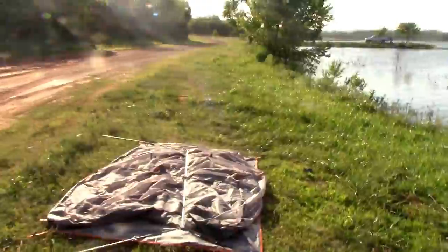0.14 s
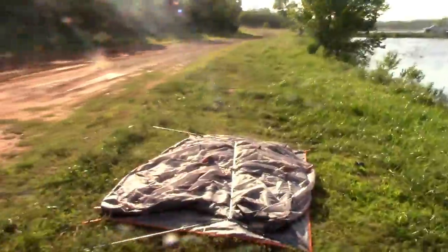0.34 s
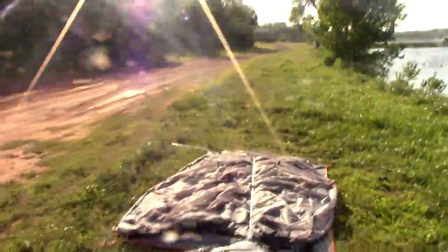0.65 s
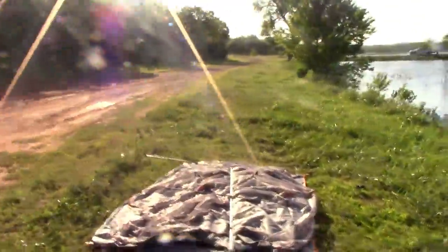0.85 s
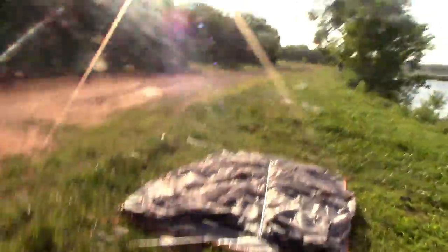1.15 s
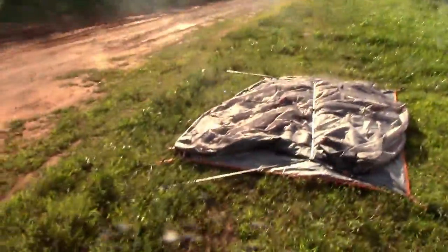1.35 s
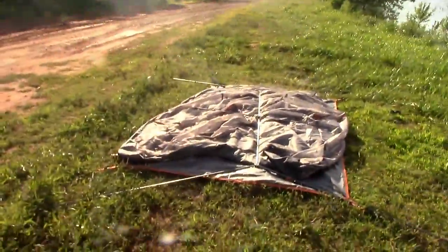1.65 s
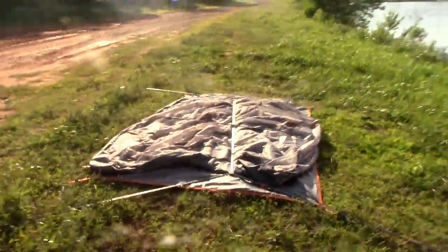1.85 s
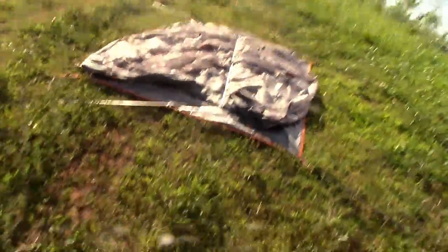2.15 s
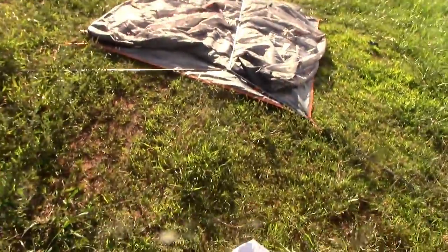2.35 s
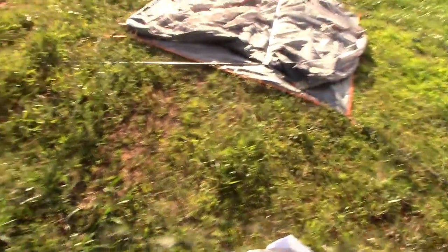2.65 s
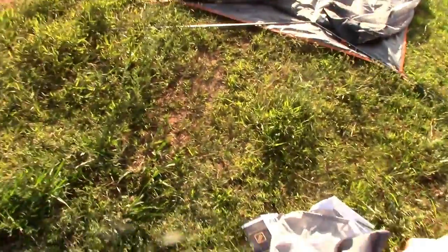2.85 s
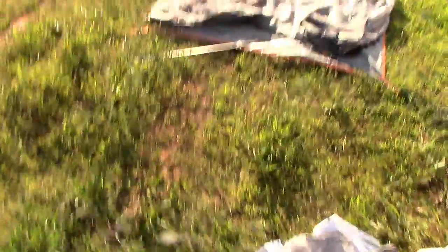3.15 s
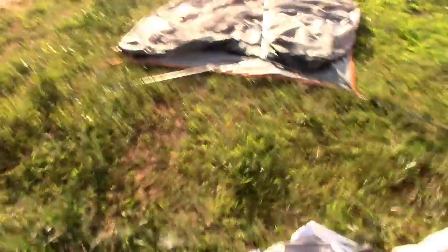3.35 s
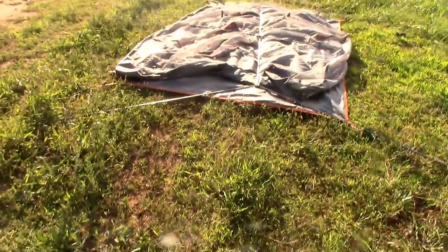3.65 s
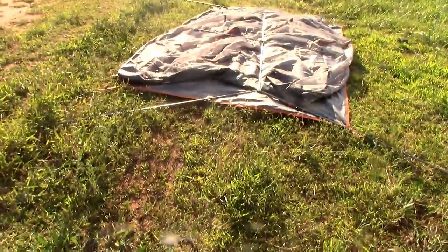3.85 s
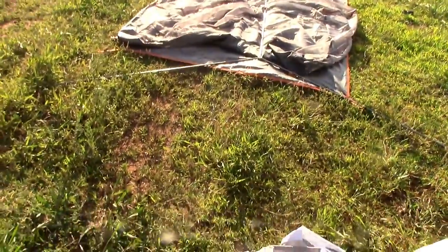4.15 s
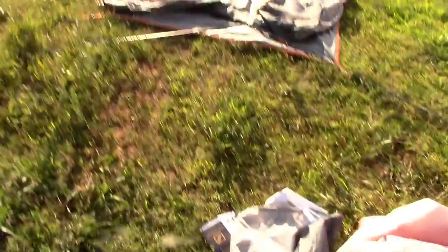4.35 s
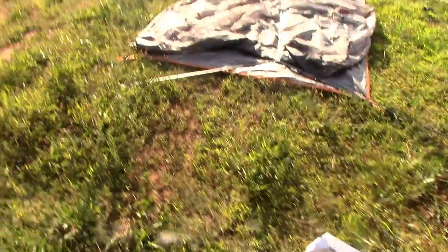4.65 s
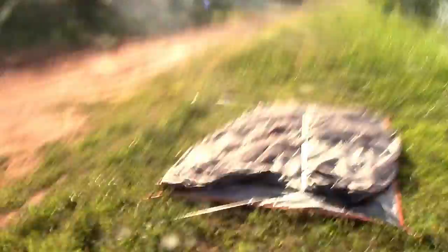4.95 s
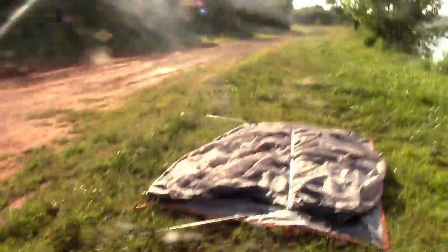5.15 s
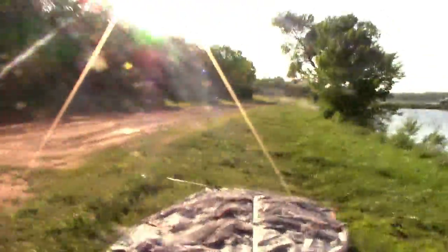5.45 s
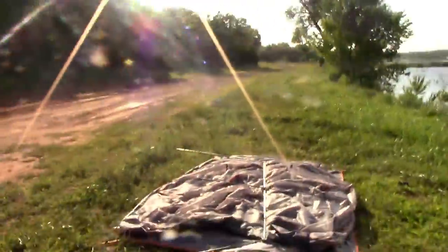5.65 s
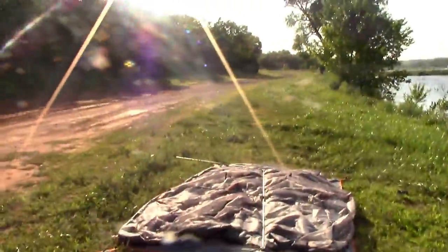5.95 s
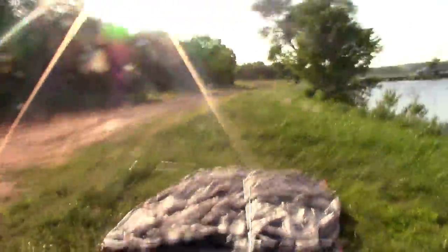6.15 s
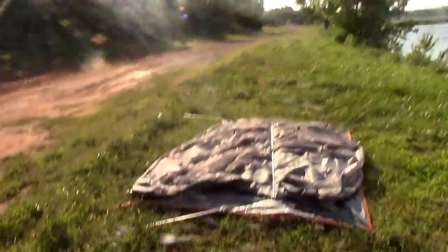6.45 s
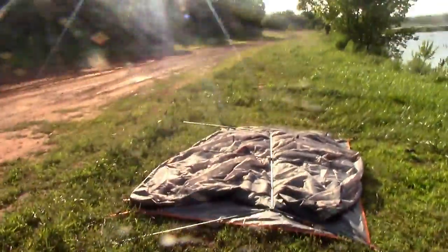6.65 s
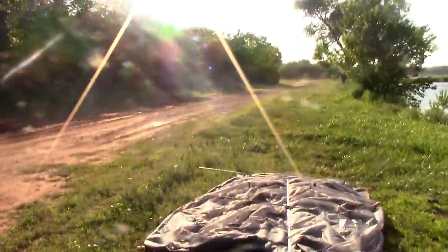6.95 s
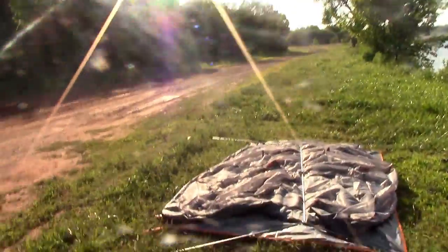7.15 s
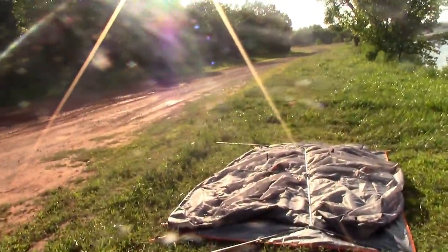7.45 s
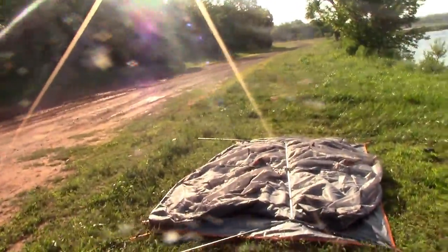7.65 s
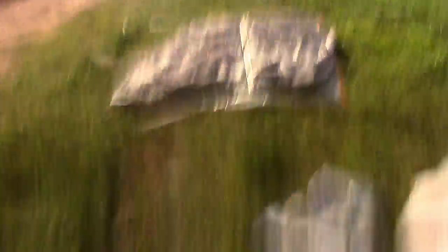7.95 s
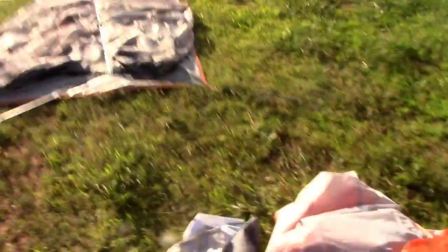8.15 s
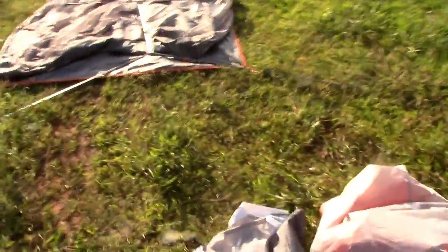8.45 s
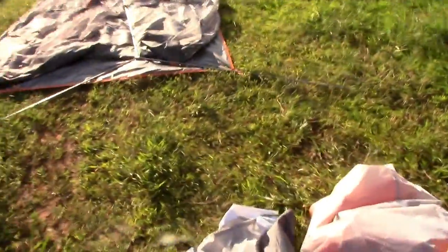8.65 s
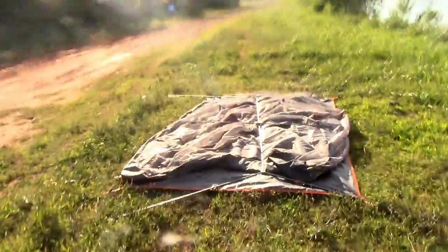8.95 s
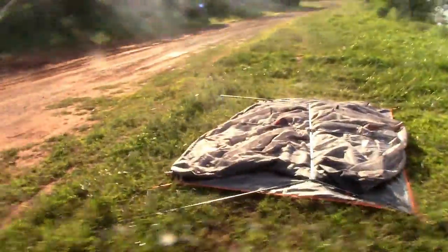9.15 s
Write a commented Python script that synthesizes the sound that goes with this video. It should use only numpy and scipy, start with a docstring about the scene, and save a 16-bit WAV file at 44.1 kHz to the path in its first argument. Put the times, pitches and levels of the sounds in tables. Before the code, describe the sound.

Irregular hard clacks of thin metal poles and crisp nylon rustling, loudest around the middle and near the end, with insects whining faintly outdoors.

```python
"""A tent is being pitched on a grassy lake bank: nylon stirs, poles and fittings clack close by.
First a thin insect whine over faint open air, one nearer singer fading by 4.4 s; the chorus sinks to 7.3 s.
From 0.3 s pole contacts ring damped modes; clusters thicken, hardest near 5 s and 8 s, the last at 9.2 s.
Pulls on the cloth shape noise and crease snaps into rubbing, crinkling and swish; noise glides, mostly
narrow, whistle, squeak or rasp; the one at 8.37 s is a broad swish of cloth."""
import sys
import numpy as np
from scipy import signal
from scipy.fft import rfft, irfft
from scipy.io import wavfile

SR = 44100
rng = np.random.default_rng(int(sys.argv[2]) if len(sys.argv) > 2 else 0)


def wav_record(signal):
    """Record a signal, one row per channel, as 16-bit PCM in the file named by sys.argv[1]."""
    frames = np.transpose(np.atleast_2d(signal))
    bounded = np.clip(frames, -1, 1)
    # unit amplitude maps onto the largest positive 16-bit level
    quanta = np.round(bounded * 32767).astype(np.int16)
    wavfile.write(sys.argv[1], SR, quanta)


N = 410571
CUTOFF_HZ = 16000  # top of the recorder and cap on mode pitch


def from_db(db):
    """Decibels to gain."""
    return 10 ** (np.asarray(db) / 20)


def rms_one(x):
    """Scale to an rms of 1."""
    return x / np.sqrt(np.mean(x ** 2) + 1e-20)


def in_time(rows):
    """Interpolate each column of a time curve, sample by sample."""
    s, *columns = np.transpose(rows)
    return [np.interp(np.arange(N) / SR, s, c) for c in columns]


def drift(rate_hz, step=40):
    """Smooth random curve, spread about 1: two-pole low-passed noise, computed every 40 samples."""
    r = np.exp(-2 * np.pi * rate_hz * step / SR)
    noise = rng.standard_normal(N // step + 2002)
    slow = signal.lfilter([1], [1, -2 * r, r * r], noise)[2000:]  # drop the settling
    return np.interp(np.arange(N) / step, np.arange(len(slow)), rms_one(slow))


def coloured(x, spectrum, size=4096):
    """Causal minimum-phase filter with the given spectrum; rms 1."""
    hz, db = np.transpose(spectrum)
    log_hz = np.log(np.maximum(np.arange(size // 2 + 1), .5) * SR / size)
    beyond = np.abs(log_hz - np.clip(log_hz, np.log(hz[0]), np.log(hz[-1])))
    log_gain = np.log(from_db(np.interp(log_hz, np.log(hz), db)))
    cepstrum = irfft(log_gain - 2 * beyond)  # 12 dB/octave outside the table
    response = irfft(np.exp(rfft(2 * cepstrum[:size // 2], size)))
    return rms_one(signal.oaconvolve(x, response)[:N])


def band(x, low_hz, high_hz):
    """Butterworth band-pass."""
    return signal.sosfilt(signal.butter(2, [low_hz, high_hz], "band", fs=SR, output="sos"), x)


def pitched_noise(hz, width_hz):
    """A band of noise around a moving pitch, an unsteady tone when narrow; rms 1."""
    smooth = signal.butter(2, width_hz / 2, fs=SR, output="sos")
    a, b = signal.sosfilt(smooth, rng.standard_normal((2, len(hz))))
    phase = 2 * np.pi * np.cumsum(hz) / SR
    return rms_one(a * np.cos(phase) + b * np.sin(phase))


# open-air spectrum: f/Hz, relative density/dB per Hz
OPEN_AIR = [(25, -20), (60, -13), (130, -7), (250, 5), (360, 5), (650, 5.5), (1200, -1.5), (2000, -4),
            (3000, -15.5), (6000, -40), (15000, -42)]


def open_air(level_db=-56):
    """Distant, even outdoor noise: steady coloured noise."""
    return from_db(level_db) * coloured(rng.standard_normal(N), OPEN_AIR)


def strands(lowest_hz=3950, highest_hz=4550, width_hz=22, count=5):
    """Single singers stand out as fine wavering lines, the higher ones stronger; rms 1."""
    voices = zip(np.linspace(lowest_hz, highest_hz, count), np.linspace(.5, 1, count))
    return rms_one(sum(gain * pitched_noise(hz + width_hz * drift(2), width_hz) for hz, gain in voices))


# chorus spectrum: f/Hz, relative density/dB per Hz
CHORUS_SPECTRUM = [(2900, -33), (3600, -6), (4100, -7.5), (4480, -3), (4800, -10.5), (5150, -14.5),
                   (6500, -33), (8900, -17), (10000, -29), (12000, -30.5), (14000, -34.5)]
# chorus course: t/s, level/dB
CHORUS_LEVEL = [(0, -47), (2.6, -48), (4.4, -50.5), (5.9, -52.5), (7.3, -56), (9.3, -56)]
# nearer insect: t/s, f/Hz, level before partials/dB
SINGER = [(0, 3884, -53.5), (1.4, 3872, -49.5), (2.7, 3973, -50.5), (3.9, 3730, -52.5), (4.4, 3710, -58)]
# its partials: multiple of pitch, width/Hz, relative level/dB
SINGER_PARTIALS = [(1, 1160, -3.5), (2, 1400, -5.5), (3, 1400, -5.5)]


def insects(shimmer_db=2.5, strands_db=-4.0):
    """Many small singers blur into one narrow band; a nearer one wavers in pitch and fades back."""
    chorus_db, = in_time(CHORUS_LEVEL)
    blur = coloured(rng.standard_normal(N), CHORUS_SPECTRUM)
    chorus = from_db(chorus_db + shimmer_db * drift(17)) * blur
    lines = from_db(chorus_db + strands_db) * strands()
    pitch_hz, singer_db = in_time(SINGER)
    singer = sum(from_db(db) * pitched_noise(multiple * pitch_hz, width_hz)
                 for multiple, width_hz, db in SINGER_PARTIALS)
    return chorus + lines + from_db(singer_db) * singer


# glides: start t/s, length/s, first f/Hz, last f/Hz, width/Hz, level before swell/dB
GLIDES = [(.33, .36, 1930, 2010, 100, -56), (1.905, .04, 4050, 4000, 250, -39),
          (1.97, .035, 1800, 1780, 90, -41), (4.08, .26, 2600, 2830, 380, -46),
          (4.6, .26, 2750, 2950, 420, -47), (5.855, .035, 6050, 5900, 700, -40),
          (.78, .5, 3740, 3830, 35, -47.5), (7.892, .022, 7150, 7080, 700, -29),
          (8.37, .062, 5800, 6200, 5000, -35)]


def glides():
    """Noise glides swell and fade: long ones likely far birds, short ones squeaking, rasping or swishing cloth."""
    out = np.zeros(N)
    for s, length_s, first_hz, last_hz, width_hz, db in GLIDES:
        start, n = round(s * SR), round(length_s * SR)
        swell = np.sqrt(np.hanning(n))
        glide = pitched_noise(np.linspace(first_hz, last_hz, n), width_hz)
        out[start:start + n] += from_db(db) * swell * glide
    return out


PULL_ATTACK_S, PULL_RELEASE_S = 0.032, 0.027


def pull_shape(start_s, length_s):
    """A pull takes up the cloth, holds and lets go; 0 to 1."""
    t = np.arange(N) / SR - start_s
    return np.clip(np.minimum(t / PULL_ATTACK_S, (length_s - t) / PULL_RELEASE_S), 0, 1)


# pulls on the nylon: start t/s, length/s, rub, crinkle, swish level before the nylon trims/dB
PULLS = [(0.078, .14, -54.5, -51.5, -55), (0.668, 0.237, -53, -47.5, -55), (1.167, 0.067, -47, -39.5, -50),
         (1.452, 0.069, -63, -41.5, -55), (1.679, .07, -40, -63, -44.5), (1.755, 0.19, -52, -46, -47),
         (1.964, 0.109, -44.5, -42.5, -54), (2.178, 0.19, -48, -43.5, -49), (2.682, 0.14, -45.5, -44, -49),
         (2.837, 0.26, -52.5, -49.5, -58), (3.152, .13, -35, -39.5, -41.5), (3.38, 0.298, -44.5, -44, -47),
         (3.872, 0.2, -47, -48.5, -52), (4.208, 0.18, -45.5, -41, -49), (4.454, 0.058, -43, -40.5, -39),
         (4.604, 0.21, -49.5, -52, -52.5), (4.918, .15, -31, -33, -43.5), (5.159, 0.21, -49.5, -51, -57),
         (5.434, 0.16, -46.5, -42.5, -52), (5.728, 0.14, -58, -49, -51),
         (5.844, 0.086, -38.5, -39.5, -47.5), (6.061, .12, -48, -38.5, -47), (6.258, 0.16, -48, -46, -50.5),
         (6.782, 0.16, -41, -45.5, -54), (6.9, 0.073, -45.5, -35.5, -39), (7.066, .15, -56, -52, -54.5),
         (7.427, 0.11, -61, -58, -52), (7.729, 0.15, -36, -35, -40.5), (7.831, .16, -32.5, -32, -38.5),
         (7.976, 0.1014, -31, -27, -38.5), (8.081, 0.1188, -41.5, -46, -63),
         (8.367, 0.079, -52, -41.5, -44), (8.49, .13, -39.5, -43, -45.5), (8.665, 0.14, -52, -44.5, -50.5),
         (8.807, 0.26, -43.5, -48.5, -52), (9.047, 0.26, -52, -47.5, -57)]
# shake of the cloth (rub, crinkle, swish) re the contact's (knock, clack, tick), before trims
SHAKE_DB, SHAKE_ATTACK_S, SHAKE_RELEASE_S = (-18, -22, -27), .01, 0.025
# slack cloth (rub, crinkle, swish), before trims
SLACK_DB, SLACK_WAVER_DB = (-53.5, -55, -62), 2.0


def cloth_levels():
    """Rub, crinkle and swish in dB: powers of slack stirring, pulls and contact shakes add up."""
    power = np.outer(from_db(SLACK_DB), from_db(SLACK_WAVER_DB * drift(9.1))) ** 2
    for start_s, length_s, *db in PULLS:
        shape = pull_shape(start_s, length_s)
        moving = np.flatnonzero(shape)
        power[:, moving] += np.outer(from_db(db), shape[moving]) ** 2
    near = np.arange(-SR // 10, SR // 10)  # samples around a contact
    shake = np.exp(np.minimum(near / SHAKE_ATTACK_S, -near / SHAKE_RELEASE_S) / SR)
    for s, _, knock_db, clack_db, _, tick_db, _ in CONTACTS:
        gains = from_db(np.add([knock_db, clack_db, tick_db], SHAKE_DB))
        power[:, np.clip(round(s * SR) + near, 0, N - 1)] += np.outer(gains, shake) ** 2
    return 10 * np.log10(power)


def friction(creases, grain_share, flutter_db):
    """Fluttering smooth sliding noise mixed with crease snaps of random strength."""
    share = np.clip(grain_share, 0, 1)
    snaps = rms_one(creases * rng.standard_normal(N))
    sliding = rng.standard_normal(N) * from_db(flutter_db * drift(46))
    return np.sqrt(share) * snaps + np.sqrt(1 - share) * sliding


def folds(x, low_hz, high_hz, shift_db, count):
    """Folds of different size take turns to sound, so band levels keep shifting; rms 1."""
    out, rest = 0, x
    for hz in np.geomspace(low_hz, high_hz, count):
        part = signal.sosfilt(signal.butter(3, hz, fs=SR, output="sos"), rest)
        rest = signal.sosfilt(signal.butter(3, hz, "high", fs=SR, output="sos"), rest)
        out = out + part * from_db(shift_db * drift(36.2))
    return rms_one(out + rest)


# cloth spectra: f/Hz, relative density/dB per Hz
RUB_SPECTRUM = [(30, -37.5), (130, -23.5), (220, -11), (340, 4.5), (520, 6), (1000, 0.5), (1400, -16),
                (1900, -15.5), (3000, -40)]
CRINKLE_SPECTRUM = [(900, -10), (1400, -6.5), (1750, -3), (2200, 4.5), (2750, 1.5), (3400, -12.5),
                    (4500, -30), (7000, -59)]
SWISH_SPECTRUM = [(2500, -12), (4000, 4.5), (5800, 3), (7200, -4), (8600, -3), (10500, -10.5), (13000, -10),
                  (16000, -23)]


def nylon(creases_per_s=240, size_db=6.0, clump_db=4.0, rub_trim_db=-0.5, crinkle_trim_db=2.5, swish_trim_db=2.0):
    """Cloth drags over poles and hands; creases give way in clumps."""
    rub_db, crinkle_db, swish_db = cloth_levels()
    # 0 to 1: light touches mostly slide, hard pulls snap creases
    effort = 1 / (1 + np.exp(-(np.maximum(rub_db, crinkle_db) + 51.5) / 3.7))
    # creases_per_s is the rate before clumping
    born = rng.random(N) < creases_per_s * from_db(clump_db * drift(20)) / SR
    creases = born * from_db(size_db * np.minimum(rng.exponential(1, N), 3))

    rub = friction(creases, grain_share=0.58 * effort, flutter_db=0.89 * effort)
    rub = folds(coloured(rub, RUB_SPECTRUM), 282, 1247, shift_db=3.25 * effort, count=4)
    crinkle = friction(creases, grain_share=0.57 * effort, flutter_db=2.0 * effort)
    crinkle = folds(coloured(crinkle, CRINKLE_SPECTRUM), 2250, 2690, shift_db=3.5, count=3)
    swish = coloured(friction(creases, grain_share=0.34, flutter_db=2.4), SWISH_SPECTRUM)
    return (from_db(rub_db + rub_trim_db) * rub
            + from_db(crinkle_db + crinkle_trim_db) * crinkle
            + from_db(swish_db + swish_trim_db) * swish)


def ring(force, modes, pitch=1, detune=0.058, spread_db=3.5):
    """A force rings damped modes; grip and striking point shift each one a little."""
    out = 0
    for k, (hz, width_hz, db) in enumerate(modes):
        r = np.exp(-np.pi * width_hz / SR)
        w = 2 * np.pi * min(hz * pitch * (1 + detune * rng.normal()), CUTOFF_HZ) / SR
        mode = signal.lfilter([1, 0, -1], [1, -2 * r * np.cos(w), r * r], force)
        out = out + (-1) ** k * from_db(db + spread_db * rng.normal()) * rms_one(mode)
    return out


def contact_force(chatter_s, chatter=0.93, scatter_db=-17, scatter_s=0.0036):
    """A first touch, a dying chatter of tiny slips, and faint scatter from the ground and cloth."""
    t = np.arange(SR // 20) / SR
    slips = rng.standard_normal(len(t)) ** 3 * np.exp(-t / max(chatter_s, 1 / SR))
    scatter = rng.standard_normal(len(t)) * np.exp(-t / scatter_s)
    touch = (t == 0) / (1 + (chatter_s / 0.0069) ** 2)  # long scrapes begin softly
    chatter_force = chatter * slips / np.linalg.norm(slips)
    scatter_force = from_db(scatter_db) * scatter / np.linalg.norm(scatter)
    return touch + chatter_force + scatter_force


# centre of the random light touches: thud, knock, clack level/dB, clack f/Hz, tick level/dB, chatter/s
LIGHT_TOUCH = (-53, -46, -37.5, 2388, -45, 0.12)
LIGHT_TOUCHES_PER_S, LIGHT_SPREAD_DB = 7, 3  # mean rate during pulls


def light_touches(count=120, pitch_spread=0.095):
    """Loose parts touch at random while the cloth drags them; rows like CONTACTS."""
    thud_db, knock_db, clack_db, clack_hz, tick_db, chatter_s = LIGHT_TOUCH
    keep_chance = LIGHT_TOUCHES_PER_S * N / SR / count
    rows = []
    for (when, chance), (body, edge, pitch) in zip(rng.random((count, 2)), rng.standard_normal((count, 3))):
        s, body_db, edge_db = when * N / SR, LIGHT_SPREAD_DB * body, LIGHT_SPREAD_DB * edge
        pulled = any(start_s < s < start_s + length_s for start_s, length_s, *_ in PULLS)
        if pulled and chance < keep_chance:
            rows.append((s, thud_db + body_db, knock_db + body_db, clack_db + edge_db,
                         clack_hz * np.exp(pitch_spread * pitch), tick_db + edge_db, chatter_s))
    return rows


# clear pole contacts: t/s, thud, knock, clack level/dB, clack f/Hz, tick level/dB, chatter/s
CONTACTS = [(0.272, -49, -36.5, -24, 1960, -29.5, 0.0009), (0.6967, -43, -38, -33, 2440, -37, 0.003),
            (0.7534, -26, -22, -14.5, 2810, -25.5, .0016), (0.7868, -49, -43, -29, 2400, -40, .0013),
            (.8042, -44, -35, -28.5, 2600, -35, .0046), (0.959, -64, -61, -28, 2310, -37, 0.0012),
            (0.9774, -64, -58, -27, 2520, -45, .002), (1.1005, -52, -51, -35.5, 2540, -45, 0.0018),
            (1.2226, -40, -32, -25.5, 2050, -38, 0.0023), (1.378, -57, -45, -27, 2375, -26, 0.0042),
            (1.636, -48, -34, -31, 2800, -35, 0.0027), (1.6803, -28, -20, -17.5, 2360, -25, 0.0045),
            (1.7696, -37, -35, -24, 3390, -23, 0.0032), (1.8984, -37, -30.5, -28.5, 2640, -29, 0.0049),
            (1.9243, -40, -33.5, -28, 2544, -28.5, 0.0046), (2.0368, -39, -38, -25, 2220, -50, .0014),
            (2.1231, -52, -35, -14.5, 2730, -19.5, 0.0013), (2.1439, -28, -16, -18, 2680, -22.5, 0.0051),
            (2.2157, -27.5, -27, -27.5, 2470, -37, 0.00054), (2.242, -34, -32, -24.5, 1690, -32, 0.0013),
            (2.274, -42, -23.5, -30, 2560, -35, 0.0074), (2.3146, -43, -41, -21.5, 2500, -27.5, 0.001),
            (2.4865, -38, -12.5, -19, 2670, -31.5, 0.0022), (2.494, -36, -20.5, -15, 2820, -25, 0.0052),
            (2.7261, -26, -42, -28, 2420, -32, 0.0069), (2.978, -41, -40, -27, 2010, -29.5, .001),
            (3.04, -57, -42, -29.5, 2210, -47, 0.0026), (3.1388, -42, -40, -28, 2220, -36, .0036),
            (3.1538, -42, -37, -27.5, 2570, -35.5, 0.0022), (3.2083, -23, -22.5, -18, 2820, -16.5, 0.0025),
            (3.229, -28, -21, -23, 2550, -33, 0.0016), (3.2477, -32, -13, -11.5, 2780, -19.5, 0.0035),
            (3.266, -40, -28, -27, 2660, -32, 0.0015), (3.328, -53, -39, -30, 2300, -38, .001),
            (3.3788, -43, -36, -29.5, 2090, -28, 0.0059), (3.3989, -35, -32, -21.5, 2570, -29, 0.0016),
            (3.5025, -45, -26, -23.5, 2130, -30.5, 0.0034), (3.5149, -27, -13.5, -16, 1960, -20.5, 0.0018),
            (3.61, -35, -29, -28.5, 2360, -50, 0.0014), (3.7458, -37.5, -25.5, -35, 2390, -40.5, .0035),
            (3.946, -27.5, -21.5, -20.5, 2060, -19, 0.0014), (3.9586, -41, -28, -30, 2580, -45, .0056),
            (4.0144, -36, -24.5, -28, 2490, -51, 0.011), (4.1016, -45, -36, -34, 2750, -25, 0.00058),
            (4.226, -37, -34.5, -31, 2810, -31, 0.0066), (4.345, -29, -14, -19.5, 2200, -27, 0.00099),
            (4.834, -53, -40.5, -28, 2320, -32, 0.0021), (4.9186, -25, -21, -10.5, 2430, -22.5, 0.0043),
            (4.926, -19.5, -16, -16.5, 2700, -22, 0.012), (4.9618, -17.5, -11.5, -14, 2320, -17.5, 0.0028),
            (4.9705, -19, -15, -5, 2436, -15.5, 0.0024), (4.9929, -35, -16, -17.5, 2240, -22.5, 0.011),
            (5.0206, -32, -21, -10.5, 2820, -15.5, 0.0035), (5.0426, -51, -52, -14.5, 2406, -23, .003),
            (5.0734, -32, -25.5, -23, 2080, -32, 0.0033), (5.2049, -43, -26, -26, 2440, -34.5, 0.0069),
            (5.2696, -43, -42, -36, 2360, -33, 0.00094), (5.3351, -28.5, -29.5, -28.5, 2520, -28, 0.0031),
            (5.5201, -19.5, -18.5, -23, 2440, -26.5, 0.0031), (5.646, -15, -19, -16, 2320, -17, 0.0057),
            (5.7058, -39, -34.5, -27, 2240, -53, 0.0028), (5.7788, -62, -50, -33.5, 2260, -33.5, .002),
            (5.8089, -33.5, -27, -18.5, 2306, -31, 0.008), (6.051, -44, -41, -32.5, 3230, -34, 0.0015),
            (6.155, -54, -24, -16.5, 2160, -18.5, 0.00097), (6.162, -23, -16.5, -12.5, 1860, -14, .0012),
            (6.1743, -27.5, -20, -14.5, 2160, -32, 0.0045), (6.2064, -50, -34, -30.5, 2340, -27.5, 0.0016),
            (6.3496, -26, -31, -24.5, 2550, -27.5, 0.0014), (6.3613, -50, -32, -23.5, 2260, -29.5, 0.00067),
            (6.5503, -35.5, -27.5, -25.5, 2560, -44, .003), (6.6255, -33, -31, -33, 2220, -34, 0.022),
            (6.7324, -43, -36, -21.5, 2200, -23, 0.0011), (6.829, -36, -22.5, -21.5, 2280, -26.5, 0.0028),
            (6.934, -58, -46, -25, 2890, -21, 0.0095), (6.9616, -56, -57, -29, 2100, -41, 0.001),
            (7.479, -50, -38, -20.5, 2560, -31.5, 0.0016), (7.7066, -50, -38.5, -16, 2550, -19, .0023),
            (7.8741, -42, -25.5, -17, 1766, -13, 0.0022), (7.9234, -46, -21, -27, 2300, -28, 0.01),
            (7.9975, -36, -25, -15, 2310, -11.5, 0.0009), (8.0033, -18.5, -16, -5.5, 2560, -13.5, 0.0037),
            (8.0331, -29, -21, -17, 2530, -30, 0.0055), (8.079, -49, -18, -24.5, 2710, -32, 0.0016),
            (8.1988, -45, -34, -35, 2130, -50, .003), (8.2426, -47, -45, -33, 2400, -33.5, 0.0046),
            (8.258, -39, -28.5, -43, 2100, -48, 0.00079), (8.4788, -36, -30.5, -27.5, 2170, -30, .002),
            (8.588, -31.5, -19, -12, 2660, -18.5, 0.0022), (8.657, -27, -22, -22, 2770, -26, 0.0078),
            (8.6753, -22.5, -17, -18.5, 2600, -18.5, 0.002), (8.829, -35, -27.5, -28.5, 2200, -63, 0.0013),
            (8.8891, -30, -39, -30, 2217, -38.5, 0.0052), (8.969, -33, -19.5, -16.5, 1820, -26.5, 0.0028),
            (9.1255, -31.5, -33.5, -26.5, 2080, -33.5, 0.036),
            (9.1924, -38, -32.5, -26.5, 2410, -32.5, 0.0038)]
# gripped-bundle modes: f/Hz, width/Hz, relative level/dB, before detune and spread
THUD_MODES = [(283, 25, -11.5), (339, 77, -2), (589, 98, 2.5)]
KNOCK_MODES = [(725, 154, 3), (867, 110, 2.5), (953, 111, 3), (1281, 62, -7.5)]
# touching-part modes: ratio to clack or tick pitch, width/Hz, relative level/dB, before detune and spread
CLACK_MODES = [(.66, 162, -3.5), (0.862, 150, -1.5), (1.003, 142, 4.5), (1.14, 177, -0.5), (1.3, 290, -1)]
TICK_MODES = [(.66, 420, 0.5), (0.821, 384, -1), (1.0, 376, 3), (1.3, 710, 3)]
# hard metal edge, independent of contact pitch: f/Hz, width/Hz, relative level/dB, before detune and spread
EDGE_MODES = [(9870, 4700, -5.5)]
CONTACT_S = .005  # levels are the sound's energy spread over this time
TICK_HZ, TICK_OCTAVES_PER_DB = 5600, 0.0647  # pitch at tick = clack level; more tick, higher pitch


def poles():
    """Each contact shakes the whole bundle and rings the two parts that touch."""
    out = np.zeros(N + SR)
    for s, thud_db, knock_db, clack_db, clack_hz, tick_db, chatter_s in list(CONTACTS) + light_touches():
        tick_hz = TICK_HZ * 2 ** (TICK_OCTAVES_PER_DB * (tick_db - clack_db))
        force, start = contact_force(chatter_s), round(s * SR)
        thud = band(ring(force, THUD_MODES), 98, 1020)
        knock = band(ring(force, KNOCK_MODES), 505, 2360)
        clack = band(ring(force, CLACK_MODES, clack_hz), 1214, 3330)
        edge = ring(force, EDGE_MODES, spread_db=2.5)
        tick = band(ring(force, TICK_MODES, tick_hz) + edge, 2000, 21000)
        for db, sound in [(thud_db, thud), (knock_db, knock), (clack_db, clack), (tick_db, tick)]:
            gain = from_db(db) * np.sqrt(CONTACT_S * SR) / np.linalg.norm(sound)
            out[start:start + len(sound)] += gain * sound
    return out[:N]


def scene():
    """Poles and cloth close by, the meadow behind."""
    return (open_air() + insects() + glides() + nylon() + poles())[None, :]


def record(dry):
    """Peaks beyond full scale clip at the input; a steep low-pass cuts the top."""
    clipped = np.clip(dry, -1, 1)
    return signal.sosfilt(signal.ellip(10, .2, 80, CUTOFF_HZ, fs=SR, output="sos"), clipped)


dry = scene()
out = record(dry)
wav_record(out)
```